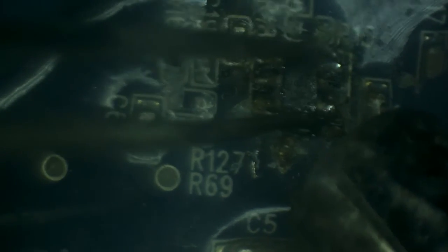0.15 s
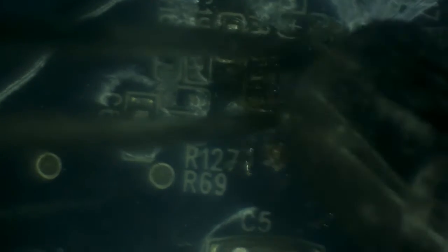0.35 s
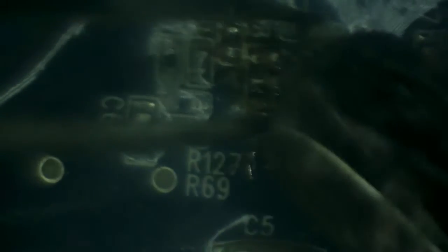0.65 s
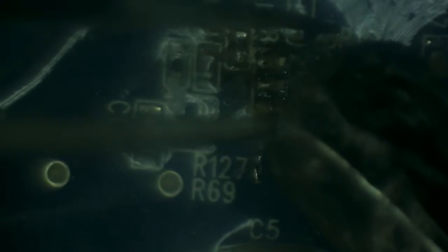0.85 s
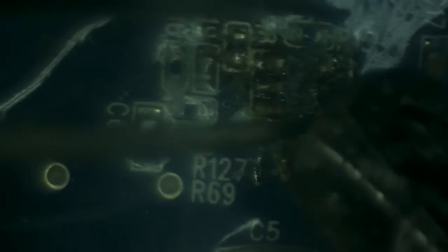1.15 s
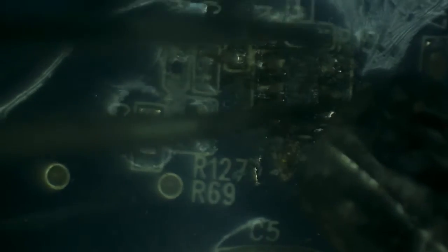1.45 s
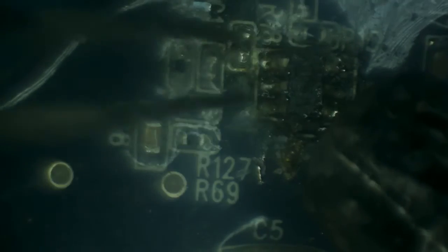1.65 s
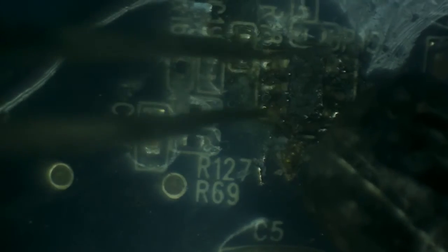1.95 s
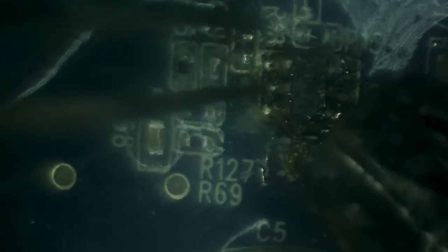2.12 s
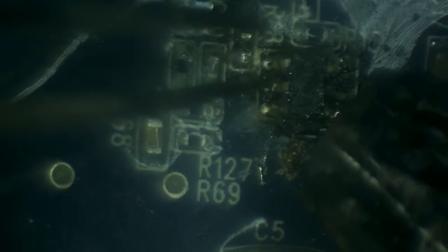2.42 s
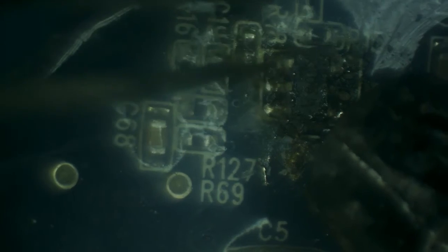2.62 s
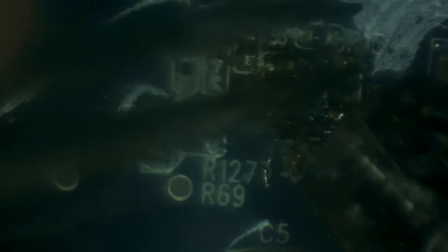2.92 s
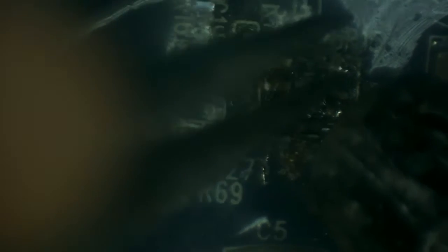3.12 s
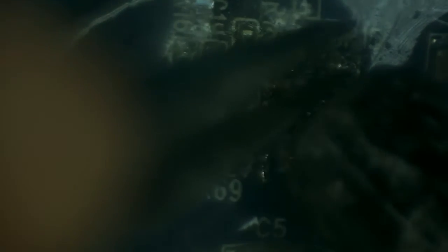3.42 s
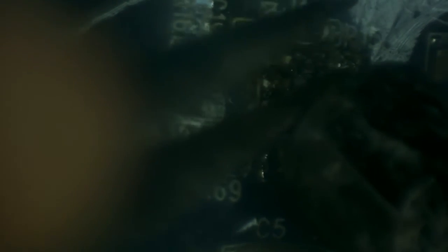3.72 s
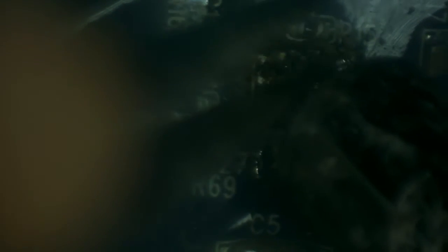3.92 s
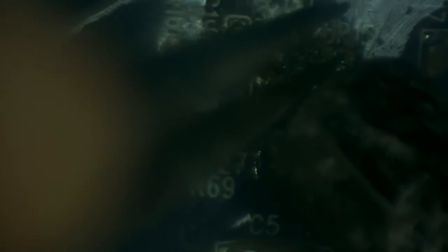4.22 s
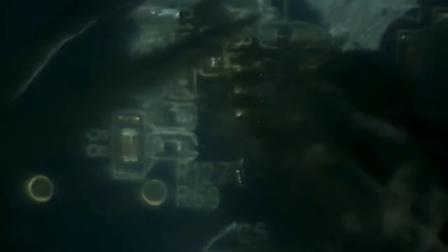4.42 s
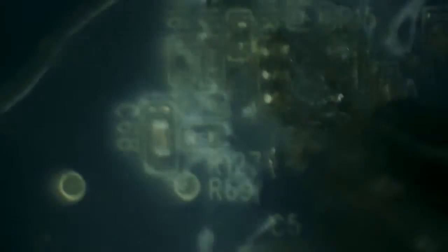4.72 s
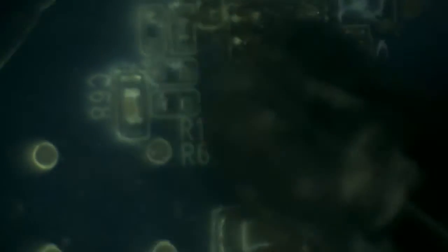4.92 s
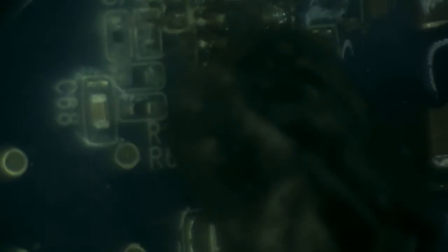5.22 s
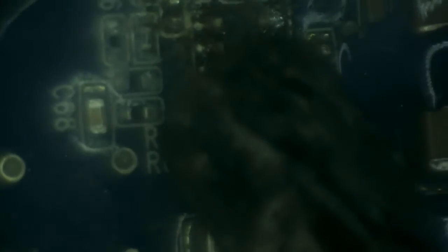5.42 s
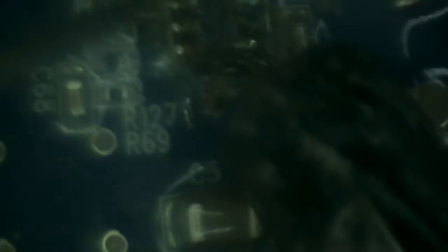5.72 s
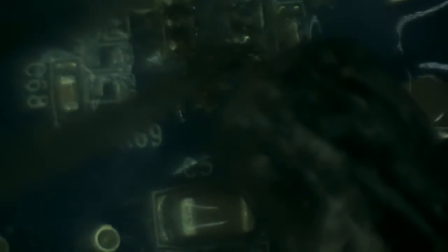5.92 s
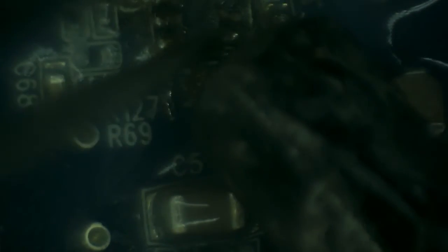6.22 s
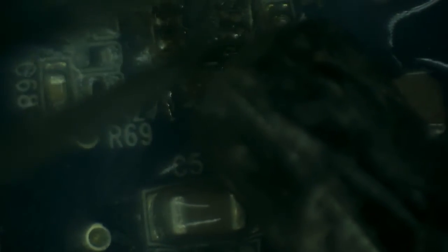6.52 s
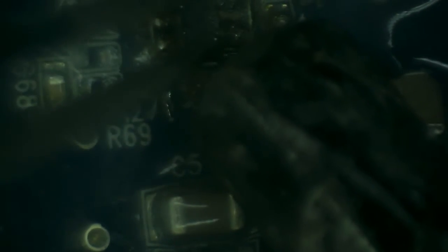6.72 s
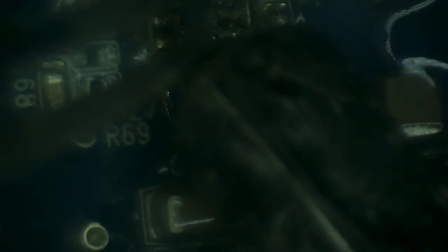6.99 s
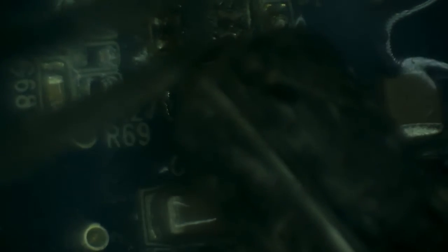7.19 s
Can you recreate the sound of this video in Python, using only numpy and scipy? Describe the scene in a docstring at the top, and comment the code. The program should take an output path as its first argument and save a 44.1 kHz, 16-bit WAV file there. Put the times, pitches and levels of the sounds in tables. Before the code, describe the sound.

A hot air tool hisses close to the microphone at a dry workbench, continuously for just over seven seconds. The sound is a dense, bright jet of air, strongest from about 3 to 10 kHz with a ringing emphasis near 4.6 kHz, fine fizz on top and slight fluttering. Beneath it lies a faint hollow rush from the duct. The hiss firms up slightly near 0.8 s; a light metal tick comes at 2.5 s. From about 3.4 s its colour shifts subtly as the aim steepens. At 4.3 s it surges, then sweeps away, dropping clearly by 4.6 s to a thinner, hollower hiss, with soft scuffs and the clearest tick near 4.7 s. It wavers, then swishes back at 5.2 to 5.4 s, briefly louder, with a faint mouth-of-pipe hollowness. It then steadies, easing slightly, with a barely audible tick at 6.4 s and a faint scuff at 6.9 s.

```python
"""At a workbench, a hot air rework nozzle hisses onto a circuit board, close to a mono microphone.
The jet is turbulent noise, coloured by the gap under the nozzle and by its aim; it is lifted off once and brought back.
Resonance of the air duct gives a soft hollow rush underneath, and a narrow band of noise sounds at the nozzle's mouth.
Shaped noise makes soft scuffs of the handpiece; decaying partials and noise make a metal tool tick on the board."""
import sys
import numpy as np
from scipy import signal
from scipy.fft import rfft, irfft, next_fast_len
from scipy.io import wavfile
from scipy.ndimage import map_coordinates

SR = 44100
rng = np.random.default_rng(int(sys.argv[2]) if len(sys.argv) > 2 else 0)


def to_wav(sig):
    """Store sig (one row per channel, or 1-D mono) as 16-bit WAV at the path in sys.argv[1].

    Samples outside -1..1 are clipped; the rate is SR.
    """
    pcm = np.clip(np.atleast_2d(sig), -1, 1) * 32767
    pcm = np.round(pcm).astype(np.int16)
    wavfile.write(sys.argv[1], SR, pcm.T)  # frames by channels


N = 324135

# Force of the jet on the board. Each row: time in seconds, hiss level in dB, fine fizz level in dB.
JET_FORCE = [(0.0, -37.5, -48.5), (0.14, -39, -48), (0.33, -38.5, -51), (0.78, -34, -43),
             (1.0, -36.5, -46.5), (1.76, -35.5, -50), (3.3, -37, -48), (3.52, -35, -44.5),
             (4.26, -36.5, -45), (4.3, -32.5, -49.5), (4.5, -40, -45.5), (4.58, -46.5, -54),
             (4.65, -44.5, -56), (4.67, -40.5, -47), (4.83, -41.5, -55), (4.89, -38, -50),
             (5.14, -40, -52.5), (5.26, -34.5, -47), (5.36, -32, -47.5), (5.67, -34, -50),
             (6.22, -35.5, -49.5), (7.35, -37, -51.5)]
# Resonance of the gap under the nozzle, highest while it is lifted. Each row: time in seconds, pitch in Hz.
GAP_PITCH = [(0, 4500), (.8, 4640), (2.2, 4520), (3.6, 4710), (4.3, 4640), (4.8, 4860), (5.06, 5180),
             (5.42, 4750), (5.9, 4710)]
# How the nozzle is held; the rest is the plain aim.
# Each row: time in seconds, share steep, share lifted, share slanted (0 to 1).
AIM_SHARES = [(2.8, 0, 0, 0), (3.35, .4, 0, 0), (3.45, 1, 0, 0), (4.25, 1, 0, 0), (4.5, 0, 1, 0),
              (5.17, 0, 1, 0), (5.38, 0, 0, 1)]
# Peaks and notches of the hiss for each aim. Each row: centre in Hz, width at half height in Hz, height in dB.
PLAIN_PEAKS = [(3370, 100, 3), (5670, 260, -2.5), (8800, 500, 1.5), (10640, 600, 1.5), (11540, 1000, -2),
               (12200, 640, 3.5)]
STEEP_PEAKS = [(5630, 450, -2.5), (8650, 260, -5), (9500, 560, 1), (10700, 830, 2.5), (11900, 500, -7),
               (12100, 700, 5), (13100, 400, -7)]
LIFTED_PEAKS = [(1920, 370, 21), (3190, 490, 3), (4300, 500, 0), (5800, 260, -2), (7100, 500, -0.5),
                (8080, 280, -7), (8800, 250, -1), (9160, 350, 3), (10200, 300, -1.5), (12500, 500, -1),
                (13600, 900, -5)]
SLANTED_PEAKS = [(5300, 170, 1.5), (5770, 280, -1.5), (8680, 360, 5.5), (9280, 920, -4), (10200, 720, -2.5),
                 (11650, 360, 3), (12600, 500, 0), (13800, 1600, -4)]
# Height of the gap resonance at the usual force, in dB, for the plain, steep, lifted and slanted aim.
GAP_HEIGHTS = [9.6, 10, 10.9, 10.5]
# Sweeps of the nozzle away from the board and back.
# Each row: middle in seconds, length at half height in seconds, echo delay in ms, its change in ms per second.
NOZZLE_SWEEPS = [(4.38, 0.17, 0.311, -.5), (5.26, 0.14, 0.318, .33)]
# Turbulence spectrum of the jet. Each row: frequency in Hz, relative density in dB per Hz.
HISS_SPECTRUM = [(500, -51), (1900, -33.5), (2200, -18.5), (2550, -9), (2850, -8.5), (3300, -3.5),
                 (4000, -1.5), (6000, 0.5), (8200, 1), (9600, -1), (11000, -7.5), (13000, -7.5),
                 (14600, -10.5), (15700, -8.5)]
# Hollow rush of the duct. Each row: frequency in Hz, relative density in dB per Hz.
DUCT_SPECTRUM = [(20, -19.5), (100, -15), (240, -14), (400, -9), (700, -5.5), (1100, -2), (1500, 2),
                 (1950, -2.5), (2600, 4), (6000, -11), (16000, -40)]
# Duct resonances. Each row: centre in Hz, width at half height in Hz, height in dB.
DUCT_MODES = [(154, 16, 3), (313.4, 42, 8), (472, 57, 5), (638, 48, 4.5), (820, 93, 3.5), (1500, 150, 1)]
# Hollow resonance at the nozzle's mouth, one row each for the plain, steep, lifted and slanted aim.
# Each row: pitch in Hz, level in dB.
MOUTH_TONES = [(803, -80.5), (803, -79), (659, -75.5), (834, -69.5)]
# Soft scuffs of the handpiece being moved. Each row: middle in seconds, length at half height in seconds, level in dB.
SCUFF_TIMES = [(0.305, .08, -63), (4.247, 0.06, -61), (4.67, 0.13, -57.5), (4.843, .035, -57),
               (5.09, .025, -64), (5.25, 0.16, -62.5), (6.868, .06, -66)]
# Colour of the scuffs. Each row: frequency in Hz, relative density in dB per Hz.
RUB_SPECTRUM = [(150, -35), (300, -5.5), (600, 4), (1000, 1.5), (2200, 2.5), (5000, -17)]
# Tool contacts. Each row: start in seconds, relative strength in dB.
TOOL_CONTACTS = [(2.527, -29), (4.664, -23), (6.443, -35)]
# Modes of the steel tool. Each row: frequency in Hz, mean level in dB, time to decay by 60 dB in seconds.
STEEL_MODES = [(3470, -6, .014), (4970, -13, .015), (6700, -11, 0.01), (8000, -11, .012),
               (11600, -15, 0.014)]

USUAL_HISS_DB, GAP_GROWTH = -36, 0.51  # usual force; dB of gap height gained per dB of hiss above it
SWEEP_GAP_DB, SWEEP_EDGE_HZ = 2, 510  # mid-sweep rise of the gap's ring and of the hiss's lower edge
ECHO_SHARE, ECHO_FULL_HZ = 0.35, 11000  # strength of the board's echo at mid-sweep, full above this pitch
TOP_HZ = 15780  # upper band limit


def amp(db):
    """Definition of the decibel: 20 dB is a tenfold amplitude."""
    return 10 ** (np.asarray(db) / 20)


def unit(x):
    """Normalisation to a root mean square of 1."""
    return x / np.sqrt(np.mean(x ** 2) + 1e-20)


def along(points, hz):
    """Linear interpolation of (Hz, value) points on a logarithmic frequency axis."""
    f, v = np.transpose(points)
    return np.interp(np.log(hz + 1), np.log(f), v)


def curves(rows, t):
    """Linear interpolation in time of each column after the first."""
    s, *cols = np.transpose(rows)
    return [np.interp(t, s, c) for c in cols]


def bell(hz, centre, width):
    """Gaussian bump of height 1 with the given full width at half height, in frequency or time."""
    return .5 ** ((2 * (hz - centre) / width) ** 2)


def bumps(rows, hz):
    """Superposition, in dB, of a set of peaks and notches."""
    return sum(db * bell(hz, centre, width) for centre, width, db in rows)


def wobble(rate, t):
    """Smooth random fluctuation: a spline through random knots, rate of them a second."""
    knots = rng.standard_normal(int(t[-1] * rate) + 4)
    return map_coordinates(knots, [t * rate])


def filtered(x, response):
    """Linear filtering: the spectrum of x is multiplied by a response of frequency."""
    size = next_fast_len(N + SR // 2)
    gain = response(np.fft.rfftfreq(size, 1 / SR))
    return irfft(rfft(x, size) * gain, size)[..., :N]


def comb(hz, strength, delay_ms):
    """Interference of a sound with one delayed copy, as a frequency response."""
    return 1 + strength * np.exp(-2j * np.pi * hz * delay_ms / 1000)


def aim(t):
    """Mixing shares, summing to 1, of the plain, steep, lifted and slanted aim."""
    steep, lifted, slanted = curves(AIM_SHARES, t)
    return np.array([1 - steep - lifted - slanted, steep, lifted, slanted])


def jet(hiss_db=0, fizz_db=0, flutter_db=0.48, sway_db=0.32, bench_echo=0.093, bench_delay_ms=2.3):
    """Turbulence noise coloured by gap resonance and aim; it flutters as the air breaks over the parts."""
    hz, t, noise = signal.stft(rng.standard_normal(N), SR, nperseg=512, noverlap=384)
    f = hz[:, None]
    hiss, fizz = curves(JET_FORCE, t)
    gap_hz, = curves(GAP_PITCH, t)
    shares = aim(t)
    sweeping = sum(bell(t, s, length) for s, length, _, _ in NOZZLE_SWEEPS)

    # the harder the jet strikes, the more the gap rings
    gap_db = np.array(GAP_HEIGHTS) @ shares
    gap_db = gap_db + GAP_GROWTH * (hiss - USUAL_HISS_DB) + SWEEP_GAP_DB * sweeping
    peaks = [PLAIN_PEAKS, STEEP_PEAKS, LIFTED_PEAKS, SLANTED_PEAKS]
    aim_db = sum(share * bumps(rows, f) for share, rows in zip(shares, peaks))
    # in the middle of each sweep the steep lower edge of the hiss rises, then falls back
    shift_hz = SWEEP_EDGE_HZ * sweeping * np.clip((f - 1950) / 650, 0, 1)
    colour = amp(along(HISS_SPECTRUM, f - shift_hz) + aim_db + gap_db * bell(f, gap_hz, 1170))

    # the board's echo combs the treble; the comb sweeps up as the nozzle leaves and down as it returns
    for s, length, delay_ms, ms_per_s in NOZZLE_SWEEPS:
        echo = ECHO_SHARE * bell(t, s, length) * np.minimum(f / ECHO_FULL_HZ, 1) ** 2
        colour = colour * abs(comb(f, echo, delay_ms + ms_per_s * (t - s)))

    def level(band):
        """Energy sum: the root of the power in a band at each moment."""
        return np.sqrt(np.sum(colour[band] ** 2, axis=0) / len(hz))

    # coarse eddies make the hiss, the finest ones the fizz on top
    coarse = (hz > 3000) & (hz < 10000)
    fine = (hz > 11000) & (hz < 15500)
    hiss_gain = amp(hiss + hiss_db) / level(coarse)
    fizz_gain = amp(fizz + fizz_db) / level(fine)
    top = np.clip((f - 8800) / 3200, 0, 1)  # crossfade from hiss to fizz
    gain = hiss_gain ** (1 - top) * fizz_gain ** top
    air = signal.istft(noise * colour * gain, SR, nperseg=512, noverlap=384)[1][:N]

    clock = np.arange(N) / SR
    air = air * amp(flutter_db * wobble(50, clock) + sway_db * wobble(17, clock))
    # a weak reflection from the bench ripples the spectrum
    return filtered(air, lambda hz: comb(hz, bench_echo, bench_delay_ms))


def duct(duct_db=-58.5, lift_db=-3):
    """Pipe resonance: a steady flow of air through the handle rings its low modes."""
    _, _, lifted, _ = aim(np.arange(N) / SR)
    noise = rng.standard_normal(N)
    rush = unit(filtered(noise, lambda hz: amp(along(DUCT_SPECTRUM, hz) + bumps(DUCT_MODES, hz))))
    # the low drone eases when the jet is off the board
    drone = filtered(rush, lambda hz: bell(hz, 0, 610))
    return amp(duct_db) * (amp(lift_db * lifted) * drone + rush - drone)


def mouth(width_hz=240):
    """Quadrature modulation: a narrow noise band whose pitch shifts with how the nozzle faces the board."""
    pitch, db = np.transpose(MOUTH_TONES) @ aim(np.arange(N) / SR)
    band = filtered(rng.standard_normal((2, N)), lambda hz: bell(hz, 0, width_hz))
    phase = 2 * np.pi * np.cumsum(pitch) / SR
    tone = band[0] * np.cos(phase) + band[1] * np.sin(phase)
    return amp(db) * unit(tone)


def scuffs(scuff_db=0, ragged_db=0.5):
    """Friction noise: short, dull, uneven rubs."""
    clock = np.arange(N) / SR
    rub = filtered(rng.standard_normal(N), lambda hz: amp(along(RUB_SPECTRUM, hz)))
    rub = rub * amp(ragged_db * wobble(70, clock))
    strokes = sum(amp(db + scuff_db) * bell(clock, s, length) for s, length, db in SCUFF_TIMES)
    return unit(rub) * strokes


def ticks(tick_db=-5, crack_t60=0.021):
    """Impact excitation: each light contact gives a thin noise crack and a short ring of steel modes."""
    out = np.zeros(N + SR)
    t = np.arange(SR // 10) / SR
    for s, db in TOOL_CONTACTS:
        ring = 0
        for hz, level, t60 in STEEL_MODES:
            mode_db = level + rng.normal(0, 2)  # each contact excites the modes a little differently
            ring = ring + amp(mode_db - 60 * t / t60) * np.sin(2 * np.pi * hz * t)
        crack = amp(-60 * t / crack_t60) * rng.standard_normal(len(t))
        out[round(s * SR):][:len(t)] += amp(db + tick_db) * (ring + crack)
    # so small a tip radiates little bass
    highpass = signal.butter(3, 3300, "highpass", fs=SR, output="sos")
    return signal.sosfilt(highpass, out[:N])


def scene():
    """Superposition of all sources at one microphone, which feeds both channels."""
    mono = jet() + duct() + mouth() + scuffs() + ticks()
    return np.tile(mono, (2, 1))


def record(dry):
    """Band limitation: the recorder keeps nothing above its upper limit."""
    return filtered(dry, lambda hz: hz < TOP_HZ)


dry = scene()
out = record(dry)
to_wav(out)
```